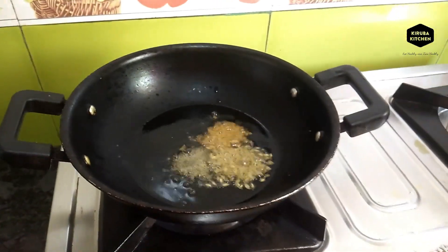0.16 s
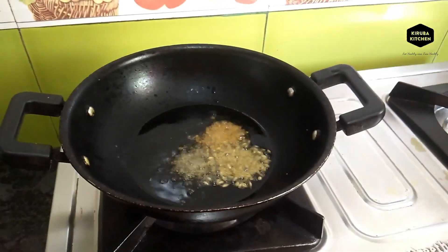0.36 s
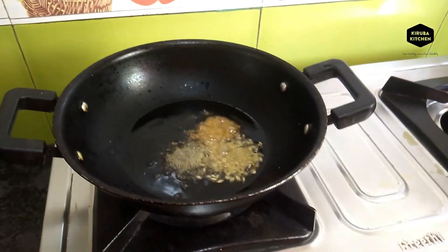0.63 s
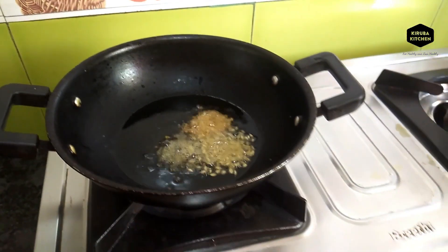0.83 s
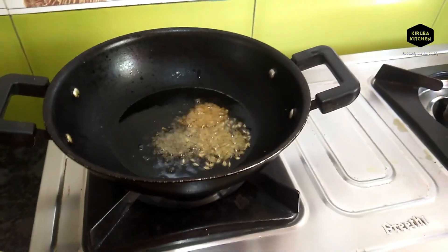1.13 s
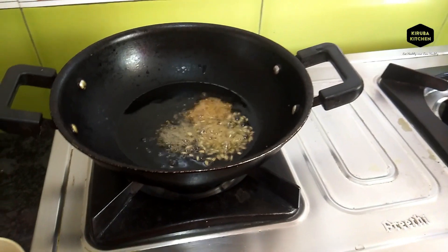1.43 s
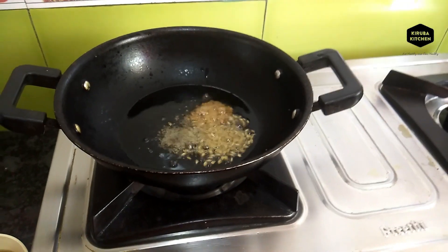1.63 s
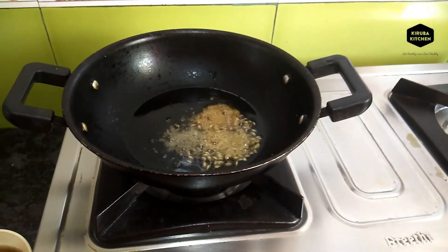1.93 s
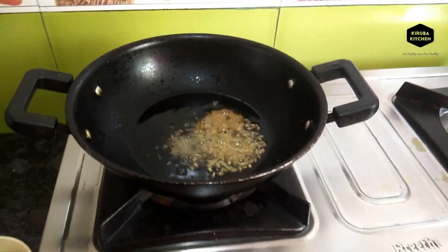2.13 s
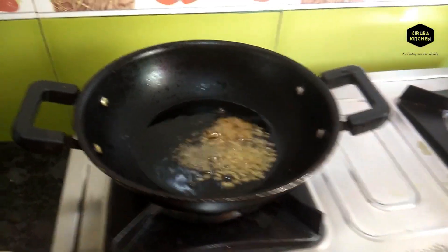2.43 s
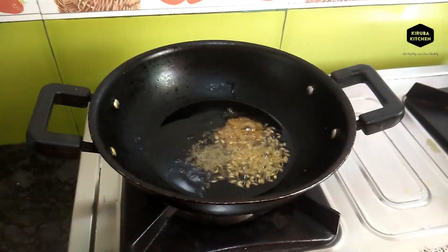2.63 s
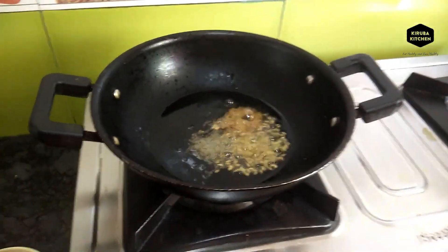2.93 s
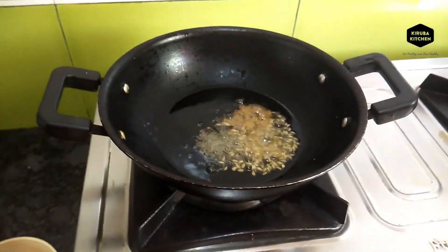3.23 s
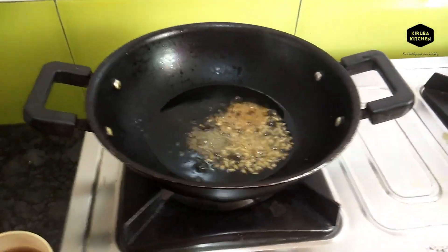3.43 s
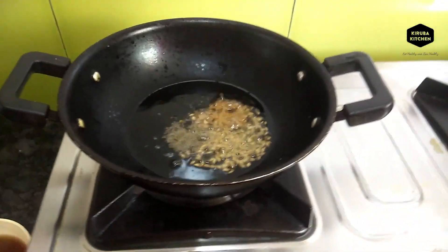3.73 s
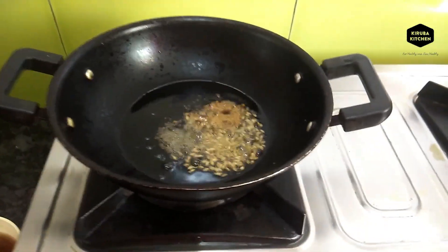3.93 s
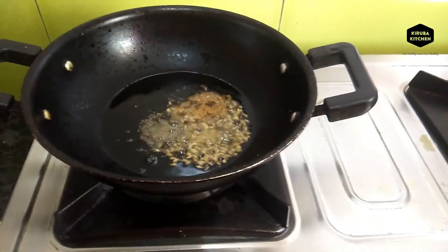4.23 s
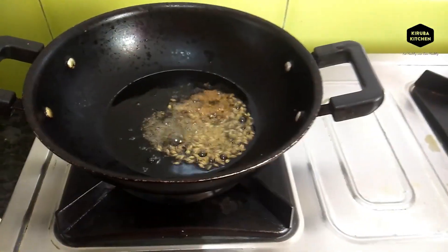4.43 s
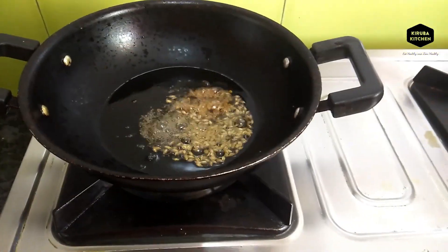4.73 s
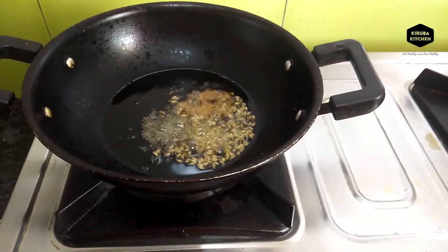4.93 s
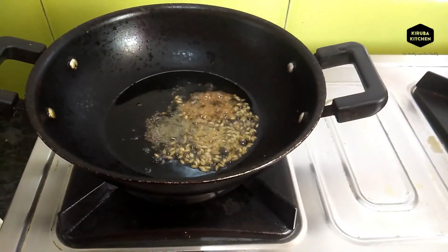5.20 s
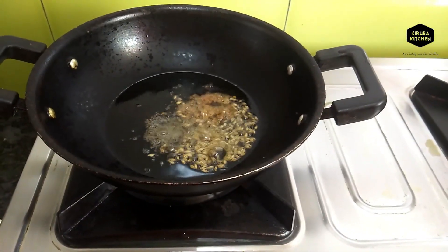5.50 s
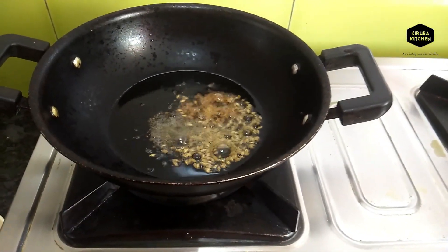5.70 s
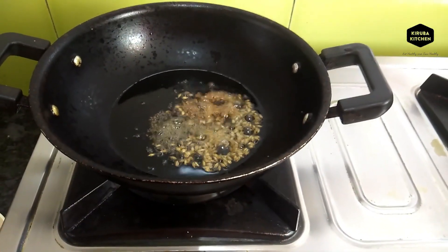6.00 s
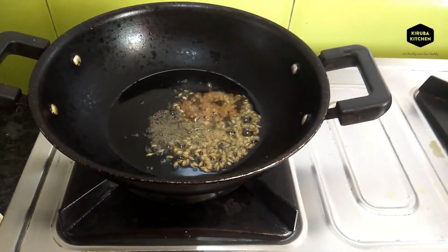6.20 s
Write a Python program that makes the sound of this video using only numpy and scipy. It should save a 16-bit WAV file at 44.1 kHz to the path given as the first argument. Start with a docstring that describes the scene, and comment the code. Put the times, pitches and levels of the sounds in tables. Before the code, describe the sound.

Seeds burst in hot oil in a wide pan, close to a handheld stereo recorder in a hard tiled kitchen. Dense sharp crackles and bright hiss come first, with two faint distant horn toots in the first half second. A droplet taps the microphone around 1.6 seconds; then the frying thins to separate pops over quieter fizz, with dull metal knocks and soft gurgles past four seconds.

```python
"""From the start small seeds burst densely in hot oil in a steel pan: each a short bubble ring that the bowl and the
tiled kitchen answer, with a puff of spray, some with a strong low knock. Oil fizzes over a gas flame.
Within the first 0.6 s a far two-tone horn toots twice; a droplet hits the recorder at 1.57 s, then fizz and bursts
thin out. Far metal knocks and low gurgles, most of them past 4 s, come from elsewhere in the room.
The two microphone ports of the handheld recorder ring at different pitches throughout."""
import sys
import numpy as np
from scipy import signal
from scipy.fft import rfft, irfft, next_fast_len
from scipy.io import wavfile
from scipy.ndimage import uniform_filter1d, map_coordinates

SR = 44100
rng = np.random.default_rng(int(sys.argv[2]) if len(sys.argv) > 2 else 0)


def invert_db(level):
    """Linear amplitude ratio for a level in decibels (20 dB per decade), elementwise."""
    return 10 ** (np.asarray(level, dtype=float) / 20)


def log_audio(samples):
    """Write samples as a 16-bit WAV file to the path given in sys.argv[1]."""
    # one column per channel
    frames = np.atleast_2d(samples).T
    # limit to full scale, then quantise
    limited = np.clip(frames, -1, 1)
    pcm = np.round(limited * 32767).astype(np.int16)
    wavfile.write(sys.argv[1], SR, pcm)


N = 280210


def unit(x):
    """Scale to rms 1."""
    return x / np.sqrt(np.mean(x ** 2) + 1e-20)


def along(points, hz):
    """(Hz, value) points read on a log frequency axis."""
    f, v = np.transpose(points)
    return np.interp(np.log(hz + 1), np.log(f + 1), v)


def coloured(x, points):
    """Filter by (Hz, dB) points with zero phase shift."""
    m = next_fast_len(N + 8192)
    gain = invert_db(along(points, np.fft.rfftfreq(m, 1 / SR)))
    return irfft(rfft(x, m) * gain, m)[..., :N]


def hiss(points, alike):
    """Coloured stereo noise of rms 1; alike is the correlation of the two sides."""
    a, b = rng.standard_normal((2, N))
    turn = np.arccos(np.clip(alike, 0, 1)) / 2
    left = np.cos(turn) * a + np.sin(turn) * b
    right = np.cos(turn) * a - np.sin(turn) * b
    return unit(coloured(np.array([left, right]), points))


def mottled(x, size, bins, depth_db):
    """Random gain in patches of time and pitch, some bins wide; rms 1."""
    z = signal.stft(x, nperseg=size)[2]
    field = uniform_filter1d(rng.standard_normal(z.shape[-2:]), size=bins, axis=0)
    field = uniform_filter1d(field, size=4, axis=1)
    return unit(signal.istft(z * invert_db(depth_db * unit(field)), nperseg=size)[1][:, :N])


def laid(start_s, rows):
    """Sum short waveforms (one per row) at their starts."""
    at = np.round(start_s * SR).astype(int)[:, None] + np.arange(rows.shape[1])
    return np.bincount(at.ravel(), rows.ravel(), N + SR)[:N]


def bursts(start_s, db, hz, knock_db):
    """Bubble cluster ringing a few cycles, crack, low knock and bowl echo; rows: left, right, into the room."""
    t = np.arange(256) / SR
    db, hz, knock_db = db[:, None], hz[:, None], knock_db[:, None]
    chance = rng.standard_normal((len(start_s), 8))
    ring = 0
    for k, ratio in enumerate((0.8, 1, 1.35)):  # a larger and a smaller bubble beside the main one
        pitch_hz = hz * ratio * np.exp(0.097 * chance[:, k, None])
        side_db = (k != 1) * (-6.5 + 2.7 * chance[:, 6 + k // 2, None])
        ring = ring + invert_db(side_db) * np.sin(2 * np.pi * pitch_hz * t) * np.exp(-t * pitch_hz / 3.2)
    grit = rng.standard_normal((len(start_s), len(t)))
    grit = grit - np.roll(grit, 4, axis=1)
    crack = invert_db(0.5) * grit * np.exp(-t / 0.00021)
    knock = invert_db(knock_db + 22.5) * np.sin(2 * np.pi * 1150 * t) * np.exp(-t / 0.00048)
    pop = invert_db(db - 12) * (ring + crack + knock) * (1 - np.exp(-t / 0.00032))

    echo_s = 0.001319 * np.exp(0.25 * chance[:, 3])  # from the far wall of the bowl
    echo = pop * invert_db(-7 + 0.8 * chance[:, 4, None])
    shift_s = 0.00006 * chance[:, 5]  # the echo's path to each port differs a little
    direct = [laid(start_s, pop) + laid(start_s + echo_s + side * shift_s, echo) for side in (-1, 1)]

    # averaged over all directions the burst is one broad push: this is what the walls receive
    push = np.sin(2 * np.pi * hz * t) * np.exp(-t * hz / 0.63)
    spread = invert_db(db - 6.5) * (push + 0.29 * knock)
    return np.array(direct + [laid(start_s, spread)])


# Distinct seeds. Each row: start in seconds, relative level in dB, nominal bubble pitch in Hz.
SEEDS = [(0.0242, -9.5, 3930), (0.0406, -12.5, 4930), (0.13, -14.5, 2820), (.1686, -25, 3780),
         (0.1878, -12, 3530), (0.1983, -18.5, 4630), (0.2058, -12, 3100), (.2448, -13, 3820),
         (0.2668, -12.5, 5120), (0.3168, -15.5, 4160), (0.3429, -13, 3550), (0.3794, -14.5, 4420),
         (0.4314, -15.5, 3720), (0.4586, -11, 3840), (0.5388, -23, 5470), (0.6034, -14, 4070),
         (0.613, -17, 4030), (0.627, -21, 4200), (0.6897, -16.5, 5800), (0.6998, -14.5, 4160),
         (.756, -13.5, 4250), (0.7735, -19, 5400), (0.7823, -16, 4660), (0.793, -19, 4330),
         (.804, -13.5, 4230), (0.8302, -14, 5840), (0.863, -13.5, 6500), (0.8987, -13, 4300),
         (.9247, -24.5, 5550), (1.002, -17, 3140), (1.0282, -9, 3600), (1.095, -25, 4960),
         (1.1302, -17, 3670), (1.166, -7, 3220), (1.172, -15, 3500), (1.1998, -12.5, 3700),
         (1.2508, -14.5, 3830), (1.285, -11.5, 4400), (1.3287, -18.5, 3950), (1.3457, -14.5, 4430),
         (1.3577, -10, 3680), (1.435, -6.5, 6330), (1.495, -22, 3950), (1.525, -13, 4840),
         (1.562, -10.5, 4440), (1.6416, -12, 3500), (1.6795, -14.5, 6230), (1.7667, -15.5, 5400),
         (1.794, -22, 4100), (1.825, -19.5, 3320), (1.8985, -18, 4260), (1.9839, -19, 4080),
         (2.033, -23.5, 6900), (2.0485, -18.5, 3160), (2.1023, -13, 3200), (2.1661, -23, 5200),
         (2.2062, -13.5, 4700), (2.2566, -16, 3860), (2.2825, -10, 3370), (2.299, -16.5, 3300),
         (2.3335, -16.5, 4720), (2.38, -24.5, 4160), (2.4976, -24, 3360), (2.541, -19.5, 3900),
         (2.565, -14.5, 5860), (2.6003, -23, 4240), (2.615, -22, 4220), (2.6548, -19, 3340),
         (2.691, -14, 3440), (2.7282, -11, 4100), (2.7743, -17.5, 3400), (2.8017, -21, 3320),
         (2.8207, -26, 3340), (2.836, -21, 4030), (2.9392, -15, 7120), (2.95, -21.5, 4500),
         (3.0052, -27, 5600), (3.129, -26, 5170), (3.1454, -22.5, 4700), (3.2107, -11, 5380),
         (3.229, -36, 3130), (3.2486, -17, 4650), (3.285, -17.5, 4000), (3.3711, -14, 3420),
         (3.4892, -19.5, 3070), (3.741, -32, 4380), (3.6756, -41, 2850), (3.807, -18, 3480),
         (3.9094, -13.5, 2980), (3.981, -8.5, 6640), (4.0378, -18, 4700), (4.13, -30.5, 2720),
         (4.172, -22, 5400), (4.2523, -13, 4380), (4.261, -13.5, 5570), (4.3292, -23, 3510),
         (4.3814, -24.5, 4160), (4.433, -12, 3530), (4.523, -13, 4040), (4.544, -20.5, 4000),
         (4.5724, -24, 4930), (4.587, -18, 3480), (4.7734, -31, 2800), (4.7829, -26, 3140),
         (4.844, -21.5, 3020), (4.8554, -11.5, 6150), (4.902, -15.5, 5430), (4.935, -15.5, 4160),
         (5.039, -26.5, 4530), (5.0689, -18, 2480), (5.1843, -9.5, 3770), (5.3242, -12.5, 5070),
         (5.3765, -24.5, 4650), (5.4887, -16.5, 4560), (5.5451, -18, 3080), (5.75, -27, 5870),
         (5.7951, -21.5, 2940), (5.8392, -17.5, 4180), (5.929, -11, 6030), (6.0212, -25.5, 3850),
         (6.076, -29, 4000), (6.1119, -26.5, 4000), (6.1571, -28.5, 6600), (6.263, -25, 5160)]


def seeds(rows):
    """Seeds burst at their moments; the lower the bubble, the stronger its knock."""
    start_s, db, hz = np.transpose(rows)
    knock_per_octave_db, knock_scatter_db = -10.5, 3
    knock_db = -27.5 + knock_per_octave_db * np.log2(hz / 4000)
    knock_db = knock_db + knock_scatter_db * rng.standard_normal(len(start_s))
    return bursts(start_s, db, hz, knock_db)


# Oil activity. Each row: time in seconds, relative fizz level in dB.
FIZZ_LEVEL = [(0.0, -41), (1.5, -39.5), (1.75, -47.5), (3.86, -58.5), (4.33, -57.5), (5.62, -59),
              (5.96, -53), (6.35, -58.5)]
BUSY_DB = -44  # fizz level at which half of the small seeds burst


def fizz_level_db(time_s):
    """Fizz level, straight lines in dB between the rows; it also drives small seeds, crackle, puffs and mist."""
    return np.interp(time_s, *np.transpose(FIZZ_LEVEL))


def small_seeds(fizz_db):
    """Lesser seeds burst at random, more often and louder while the oil is busy: rows as in SEEDS."""
    busy_slope_db, over_fizz_db, scatter_db = 4, 16, 2
    start_s, luck, size, pitch = rng.random((260, 4)).T
    start_s = start_s * (N / SR - 0.02)
    busy_db = fizz_db[(start_s * SR).astype(int)]
    bursting = luck < 1 / (1 + np.exp((BUSY_DB - busy_db) / busy_slope_db))
    db = busy_db + over_fizz_db + scatter_db * 2 * (size - 0.5)
    return np.transpose([start_s, db, 3000 * 2.1 ** pitch])[bursting]


def crackle(fizz_db):
    """Many small bubbles burst at random, their level following the fizz."""
    start_s, size, pitch = rng.random((1200, 3)).T
    start_s = start_s * (N / SR - 0.02)
    db = fizz_db[(start_s * SR).astype(int)] - 4 * np.log(size + 0.03)
    return bursts(start_s, db, 2600 * 2.6 ** pitch, np.full(len(start_s), -24))


# Jets of steam and oil, strong and faint. Each row: start in seconds, relative level in dB,
# length in seconds, of which a share of 0.32 is held.
JETS = [(0.021, -31, 0.097), (0.18, -48, .04), (0.263, -30, 0.055), (0.353, -31.5, 0.045),
        (0.594, -39, 0.066), (0.75, -45, 0.14), (0.829, -31.5, 0.053), (0.898, -32.5, 0.0051),
        (0.969, -38.5, .019), (1.09, -33, 0.025), (1.156, -37, 0.36), (1.342, -32, 0.037),
        (1.428, -36, 0.015), (1.563, -13, 0.0024), (1.616, -30, .014), (1.672, -34.5, 0.018),
        (1.895, -38, 0.018), (2.064, -41.5, 0.06), (2.2, -41, .01), (2.281, -30, 0.0077),
        (2.331, -35.5, 0.074), (2.691, -38.5, 0.077), (3.14, -41.5, 0.012), (3.371, -36.5, 0.029),
        (3.96, -50, 0.039), (4.252, -45, .024), (4.427, -38.5, .0052), (4.897, -40, 0.028),
        (5.063, -44, 0.04), (5.179, -37, .014), (5.322, -30.5, .0047), (5.486, -34, 0.0036),
        (5.543, -37.5, 0.024), (5.723, -38.5, 0.0082), (5.92, -41.5, 0.031), (6.152, -45.5, 0.026)]
# Spray spectrum at the source. Each row: frequency in Hz, relative density in dB.
SPRAY_TONE = [(1500, -6), (4000, -9), (7000, -11), (9000, 0.5), (13500, 9), (15300, 6.5)]


def spray():
    """Steam jets and the puff of each distinct seed throw oil: a bright hiss that swells fast, holds and stops."""
    puff_db, puff_scatter_db, puff_length_s = -29, 4.5, 0.026  # puff_db is relative to the seed
    puff_growth = 0.21  # dB of spray per dB of fizz over BUSY_DB
    t = np.arange(N) / SR
    puffs = []
    for start_s, seed_db, _ in SEEDS:
        growth_db = puff_growth * (fizz_level_db(start_s) - BUSY_DB)
        db = seed_db + puff_db + growth_db + puff_scatter_db * rng.standard_normal()
        puffs.append((start_s, db, puff_length_s))
    power = np.zeros(N)
    for start_s, db, length_s in list(JETS) + puffs:
        near = slice(max(0, round((start_s - 0.02) * SR)), round((start_s + 0.2) * SR))
        since_s = t[near] - start_s - 0.003
        swell = np.clip(since_s / 0.01 + 1, 0, 1)
        stop = np.exp(-np.maximum(since_s - 0.32 * length_s, 0) / 0.0033)
        power[near] += (invert_db(db) * swell * stop) ** 2
    noise = mottled(hiss(SPRAY_TONE, alike=0.63), size=512, bins=40, depth_db=2.0)
    return np.sqrt(power) * noise * invert_db([[-1.5], [1.5]])  # stronger on the right


# Low knocks heard with some bursts. Each row: start in seconds, relative level in dB.
LOW_KNOCKS = [(0.168, -32), (0.43, -36), (0.603, -31.5), (0.7, -32), (0.755, -35), (0.792, -26.5),
              (1.125, -34), (1.357, -27), (1.897, -33.5), (2.045, -39), (2.507, -33.5), (2.689, -31.5),
              (3.488, -36), (3.807, -40), (4.26, -32.5), (4.328, -37), (4.432, -35), (4.522, -31),
              (5.068, -39.5)]
# Knock modes. Each row: frequency in Hz, relative level in dB, T60 in seconds.
LOW_KNOCK_MODES = [(840, -9, .006), (1190, -6, 0.0067), (1840, -4, 0.0065)]


def low_knocks():
    """Low damped knocks that accompany some of the bursts, their modes at new strengths each time."""
    t = np.arange(SR // 20) / SR
    start_s, db = np.transpose(LOW_KNOCKS)
    strength_db = 3 * rng.standard_normal((len(start_s), len(LOW_KNOCK_MODES)))
    rows = 0
    for k, (hz, mode_db, t60_s) in enumerate(LOW_KNOCK_MODES):
        decay_db = db[:, None] + mode_db + strength_db[:, k, None] - 60 * t / t60_s
        rows = rows + invert_db(decay_db) * np.sin(2 * np.pi * hz * t)
    return laid(start_s, rows)


# One droplet on the recorder: start in seconds, relative level in dB.
SLAP = (1.5713, -3.1)


def slap():
    """A droplet hits the recorder: a single short push with a dull thump."""
    t = np.arange(SR // 10) / SR
    start_s, db = SLAP
    push = np.exp(-((t - 0.0001) / 0.00007) ** 2)
    thump = -0.36 * np.sin(2 * np.pi * 190 * t) * np.exp(-t / 0.0009)
    return laid(np.array([start_s]), invert_db(db) * (push + thump)[None])


# Fizz spectrum at the source. Each row: frequency in Hz, relative density in dB.
FIZZ_TONE = [(300, 28.5), (1000, 17), (2000, -11), (4000, 12), (6500, 9), (10000, 22.5), (15500, 23)]


def fizz(fizz_db):
    """Oil fizz: stereo noise whose level follows the oil's activity."""
    return invert_db(fizz_db - 6.5) * hiss(FIZZ_TONE, alike=0.51)


def mist(fizz_db):
    """Fine mist: spray-coloured noise, growing 1.54 dB per dB of fizz as busier oil throws much more."""
    return invert_db(1.54 * fizz_db - 4.5) * hiss(SPRAY_TONE, alike=0.18)


# Decay of the tiled room. Each row: frequency in Hz, T60 in seconds.
KITCHEN = [(300, 0.19), (1500, 0.26), (3500, 0.19), (9000, 0.13), (15000, 0.28)]


def kitchen(x):
    """Tiled walls answer; each short stretch gets a new random tail, as each seed sits elsewhere."""
    step, size = 2048, 12288  # samples
    blocks = np.pad(x, ((0, 0), (0, -N % step))).reshape(2, -1, step)
    noise = rng.standard_normal((2, blocks.shape[1], size - step))
    hz, t, z = signal.stft(noise, SR, nperseg=256)
    decay = invert_db(-60 * t / along(KITCHEN, hz)[:, None])
    tail = signal.istft(z * decay, SR, nperseg=256)[1][..., :size - step]
    tail = tail * np.clip(np.arange(size - step) / SR / 0.0056, 0, 1)
    tail = tail / np.linalg.norm(tail, axis=-1, keepdims=True)
    wet = irfft(rfft(blocks.mean(0), size) * rfft(tail, size), size)
    return np.array([laid(np.arange(len(side)) * step / SR, side) for side in wet])


# Horn tones. Each row: frequency in Hz, relative level in dB.
HORN = [(248, -43.5), (301, -41)]
# Each row: start in seconds, start of the release in seconds.
TOOTS = [(0.303, 0.37), (.455, 0.514)]


def horn():
    """A far two-tone horn with a weak overtone, soft at both ends; each tone wavers in strength."""
    overtone_db, waver_db = -17.5, 2
    t = np.arange(N) / SR

    def waver():
        return waver_db * map_coordinates(rng.standard_normal(200), [t * 25])  # 25 random points a second

    gate = 0
    for start_s, end_s in TOOTS:
        gate = gate + np.clip((t - start_s) / 0.02, 0, 1) * np.exp(-np.maximum(t - end_s, 0) / 0.025)
    tones = 0
    for hz, db in HORN:
        tones = tones + invert_db(db + waver()) * np.sin(2 * np.pi * hz * t)
        tones = tones + invert_db(db + overtone_db + waver()) * np.sin(2 * np.pi * 2 * hz * t)
    return gate * tones


# Far knocks on metal. Each row: start in seconds, relative level in dB.
CLANKS = [(4.283, -23.5), (4.318, -28), (4.637, -28)]
# Metal modes. Each row: frequency in Hz, relative level in dB, T60 in seconds.
CLANK_MODES = [(550, -1, 0.086), (840, 3.5, 0.065), (1005, -1.5, 0.19), (1237, -1, 0.12),
               (1506, 11.5, 0.026)]


def clanks():
    """Dull metal knocks elsewhere in the room, the modes at new strengths each time, with a loose rattle."""
    rattle_db, rattle_decay_s = -19, 0.026
    t = np.arange(SR // 2) / SR
    start_s, db = np.transpose(CLANKS)
    rows = 0
    for hz, mode_db, t60_s in CLANK_MODES:
        strength_db = rng.normal(0, 2.2, (len(start_s), 1))
        decay_db = db[:, None] + mode_db - 21.0 + strength_db - 60 * t / t60_s
        rows = rows + invert_db(decay_db) * np.sin(2 * np.pi * hz * t)
    rattle = invert_db(db[:, None] + rattle_db) * rng.standard_normal(rows.shape) * np.exp(-t / rattle_decay_s)
    rattle = coloured(laid(start_s, rattle), [(500, -30), (900, 17), (1600, -1), (2300, -1), (3500, -50)])
    return laid(start_s, rows * (1 - np.exp(-t / 0.0018))) + rattle


# Dull bumps and gurgles. Each row: start in seconds, relative level in dB, starting pitch in Hz.
BUMPS = [(0.419, -45, 102), (3.533, -48, 90), (4.269, -49, 160.5), (4.388, -58, 91), (4.51, -49, 300),
         (4.547, -45, 260), (4.59, -48, 337), (4.595, -51, 110), (4.635, -52, 482), (4.655, -48.5, 253),
         (4.883, -53, 171), (5.462, -47, 93), (5.577, -56, 117), (5.653, -55, 88)]


def bumps():
    """Soft low pushes of a few cycles, the pitch creeping up like a large bubble's."""
    t = np.arange(SR // 4) / SR
    start_s, db, hz = np.transpose(BUMPS)[..., None]
    cycles = hz * t * (1 + 2.6 * t)
    swell = (t / 0.02) * np.exp(-t / 0.013)
    return laid(start_s[:, 0], invert_db(db + 14.5) * np.sin(2 * np.pi * cycles) * swell)


# Rumble spectrum at the source. Each row: frequency in Hz, relative density in dB.
RUMBLE_TONE = [(25, -38), (60, -16), (100, 7), (200, 0), (400, -1), (900, -10.5), (2500, -34.5)]


def rumble():
    """Low background noise, uneven in time and pitch."""
    return invert_db(-56.5) * mottled(hiss(RUMBLE_TONE, alike=0.71), size=2048, bins=1, depth_db=6)


def scene():
    """Pan, room and background as they reach the ports."""
    fizz_db = fizz_level_db(np.arange(N) / SR)
    popping = seeds(SEEDS) + seeds(small_seeds(fizz_db)) + crackle(fizz_db)
    direct, into_room = popping[:-1], popping[-1]
    jets = spray()
    knocks = clanks() + bumps() + low_knocks()
    walls = invert_db(-2.0) * kitchen(into_room + jets + knocks)
    oil = fizz(fizz_db) + mist(fizz_db)
    return direct + jets + walls + oil + rumble() + knocks + horn()


# Microphone port responses. Each row: frequency in Hz, gain in dB.
LEFT_PORT = [(300, -10.5), (1250, 0.5), (1450, -1), (1650, 8.5), (1850, 5.5), (2300, 10), (2800, 13),
             (4200, 15.5), (5100, 18.5), (6300, 26), (7600, 13), (10000, 4.5), (14300, -6), (15500, 2.5),
             (16300, -52)]
RIGHT_PORT = [(300, -10), (1250, 1), (1450, -2.5), (1650, 7), (1850, 10.5), (2300, 5), (2800, 20.5),
              (3400, 5.5), (4300, 15.5), (6000, 5.5), (7800, -6), (9300, -7), (11000, -9.5), (14300, -7),
              (15500, -19), (16300, -46)]


def ports(x):
    """Two cavities of their own colour that share one minimum phase, so they ring only after being struck."""
    m = 2 * next_fast_len(N // 2 + 4096)
    hz = np.fft.rfftfreq(m, 1 / SR)
    gain = np.array([invert_db(along(points, hz)) for points in (LEFT_PORT, RIGHT_PORT)])
    cepstrum = irfft(np.log(gain).mean(0), m)  # folded to be causal: its spectrum then holds the phase
    cepstrum[1:m // 2] *= 2
    cepstrum[m // 2 + 1:] = 0
    phase = rfft(cepstrum).imag
    return irfft(rfft(x, m) * gain * np.exp(1j * phase), m)[:, :N]


def smear(x, db):
    """Add a random-phase copy of the same colour, blurred some 10 ms to either side of each sound."""
    z = signal.stft(x, nperseg=1024)[2]
    turn = np.exp(2j * np.pi * rng.random(z.shape[1:]))
    return x + invert_db(db) * signal.istft(z * turn, nperseg=1024)[1][:, :N]


def low_pass(x):
    """Removes everything above the highest recorded frequency."""
    return signal.sosfilt(signal.butter(12, 16840, fs=SR, output="sos"), x)


def record(dry):
    """Each port has its own cavity resonance; the deepest bass is cut; the droplet's slap bypasses the ports."""
    x = smear(ports(dry), db=-4.5)
    x = coloured(x, [(25, -11), (70, 0.5)])
    mix = x + slap()
    return low_pass(mix)


dry = scene()
out = record(dry)
log_audio(out)
```